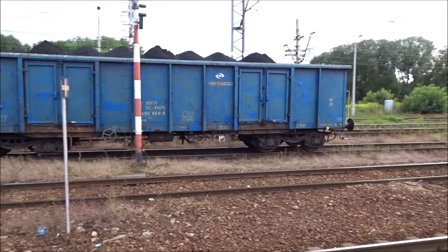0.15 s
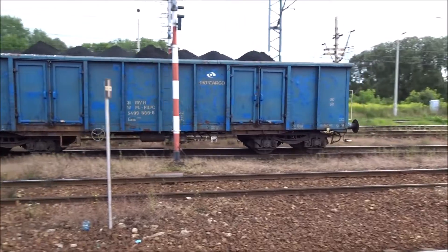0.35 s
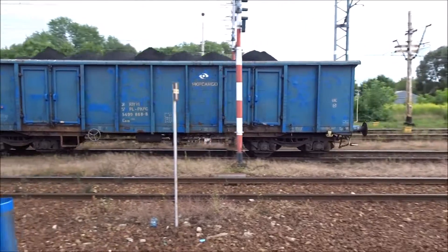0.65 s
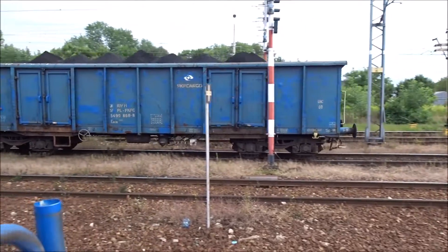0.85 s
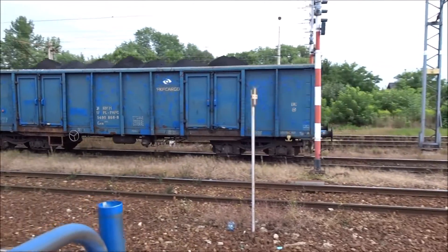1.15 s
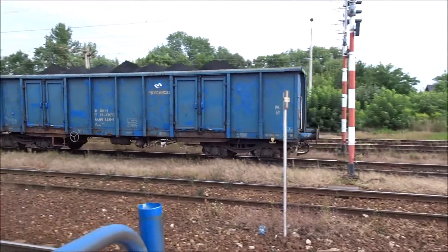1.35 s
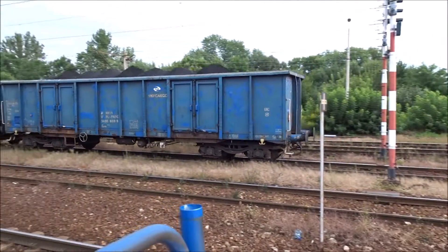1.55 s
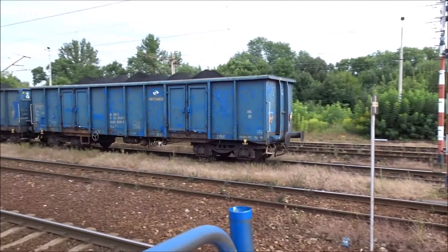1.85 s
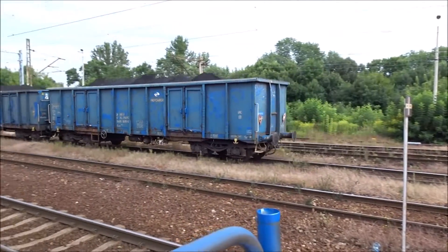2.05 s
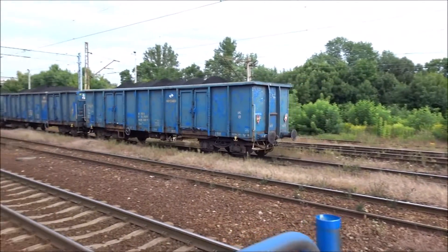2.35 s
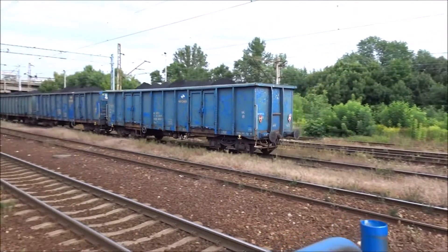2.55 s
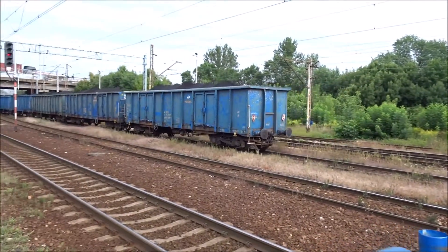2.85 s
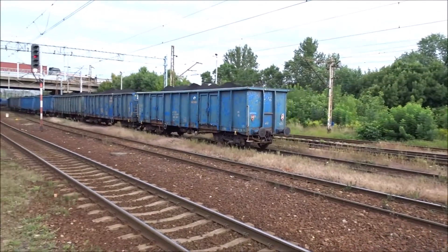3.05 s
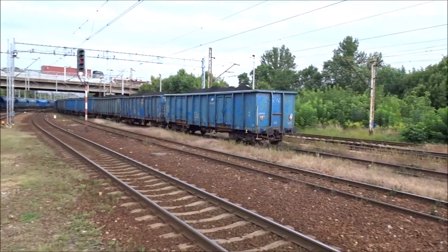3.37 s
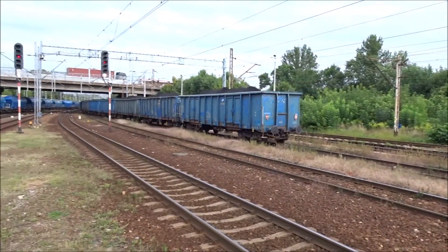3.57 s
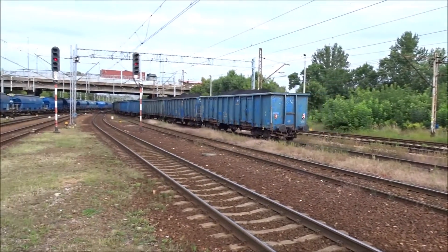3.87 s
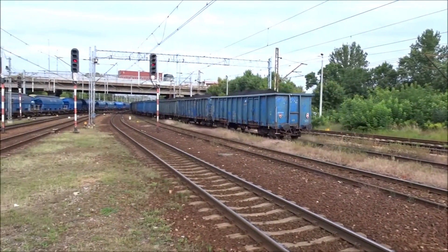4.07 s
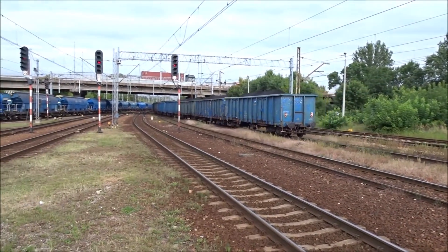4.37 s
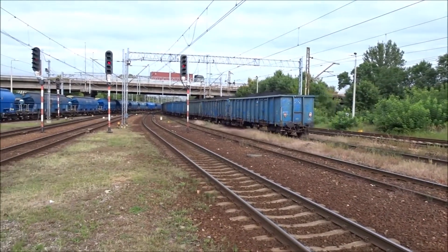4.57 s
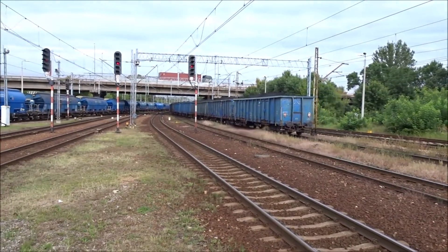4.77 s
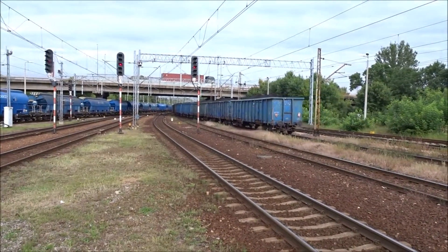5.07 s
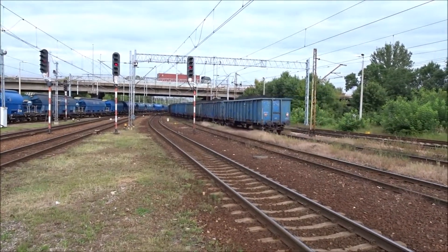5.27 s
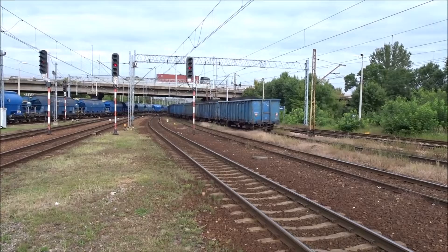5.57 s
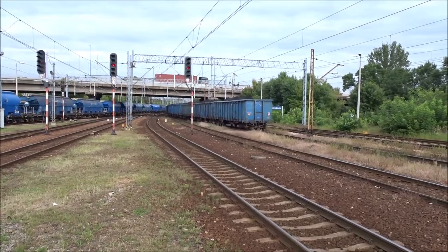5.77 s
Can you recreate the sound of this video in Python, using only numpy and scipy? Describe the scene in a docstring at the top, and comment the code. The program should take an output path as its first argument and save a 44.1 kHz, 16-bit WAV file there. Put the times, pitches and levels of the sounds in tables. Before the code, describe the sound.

Close, loud wagon wheels clatter on steel rails in the open air: gritty cracks, hollow knocks, loose metal rattling and wavering ringing tones. Sharp ticks through the rail slightly precede many blows. After a brief lull around three and a half seconds come two more strong groups, then weaker clacks as the train recedes. A handheld stereo microphone catches little deep rumble and a short hard reflection.

```python
"""Loaded freight wagons roll away over rail joints and points in an open yard.
Rolling is banded noise, resonant steel and small ringing knocks, swelling after each axle's noisy blow.
Bright hissy ticks come along the steel rail, which outruns the air; short wavering tones stand out of
the clatter. Noise makes the deep ground rumble and one brief flange hiss; a nearby hard surface adds
one short echo."""
import sys
import numpy as np
from scipy import signal
from scipy.fft import rfft, irfft, next_fast_len
from scipy.io import wavfile
from scipy.ndimage import map_coordinates

SR = 44100
rng = np.random.default_rng(int(sys.argv[2]) if len(sys.argv) > 2 else 0)


def unload_audio(sound):
    """Save the sound as a 16-bit wav file, at the path given as the first command line argument."""
    columns = np.transpose(np.atleast_2d(sound))
    # keep every value between -1 and 1, then stretch to whole-number steps
    steps = np.round(np.clip(columns, -1, 1) * 32767)
    wavfile.write(sys.argv[1], SR, steps.astype(np.int16))


N = 261072

# usual colour of wheels on rail and shaking wagons, relative: [f/Hz, level per Hz/dB]
ROLLING_COLOUR = [(130, -48), (200, -18), (290, -5), (450, -6), (800, -0.5), (1300, 1.5), (2000, -1.5),
                  (2600, 1), (3500, -3.5), (5000, -5), (7000, -13), (10000, -19), (13000, -33),
                  (15500, -50)]
# how alike left and right are across the spectrum: [f/Hz, likeness 0-1]
LEFT_RIGHT_LIKENESS = [(60, 0.76), (130, 1), (290, 1), (640, 1), (1410, 0.9), (3100, 0.67), (6820, 0.29),
                       (15000, 0.49)]
# steady rolling under the blows, with tilts against the usual colour:
# [t/s, level/dB, bass/dB, upper middle/dB, treble/dB]
STEADY_ROLLING = [(0, -18, 1, -2, -1), (.9, -18, -0.5, -2, 0.5), (1.6, -19, -5.5, -6.5, -2),
                  (2.1, -17, -0.5, -2.5, -1), (2.4, -18.5, 0.5, -4.5, 1.5), (2.8, -16.5, -5, -4.5, -4),
                  (3.4, -20.5, 0.5, -5.5, -4.5), (3.9, -19.5, 2.5, -1, -0.5), (4.9, -22, -2, -6, -4),
                  (5.92, -21.5, -1, -2, -3)]
# axles on a joint, heard through the air: [t/s, clatter level/dB, clatter duration/s, brightness/dB,
# crack level/dB, knock level/dB, knock f/Hz, thud level/dB]
AXLE_BLOWS = [(0.048, -16, 0.037, 4, -21, -22, 708, -20), (0.287, -16.5, 0.097, -1.5, -19, -33, 705, -41),
              (0.548, -15.5, 0.055, -1.5, -22, -13, 495, -21), (0.678, -15, .12, 3, -32, -13, 820, -34),
              (0.921, -13.5, 0.15, 2.5, -17.5, -13.5, 664, -25), (1.222, -17, 0.1, 6, -14.5, -36, 797, -30),
              (1.91, -15, 0.06, -1, -30, -32, 624, -26), (2.156, -13.5, 0.09, 3, -24, -18.5, 596, -34),
              (2.27, -26, 0.026, -8, -26, -39, 673, -44), (2.428, -16, 0.11, 5, -19.5, -17, 620, -36),
              (2.596, -16, 0.035, -1, -16.5, -32, 676, -23), (2.62, -17, 0.062, 8, -21, -20, 613, -36),
              (2.834, -14, 0.14, 6.5, -17, -17, 790, -21), (3.095, -16, 0.099, 5, -14, -23, 576, -40),
              (3.482, -23, 0.12, 8, -33, -30, 790, -38), (3.709, -27, 0.053, 2, -24, -23.5, 611, -38),
              (3.781, -10.5, 0.097, -2.5, -26, -25, 800, -23),
              (4.008, -14.5, 0.044, -6, -21, -16, 570, -38), (4.034, -14, 0.11, 1.5, -31, -12, 750, -23),
              (4.268, -27, .015, 0, -19, -15, 810, -25.5), (4.295, -17.5, 0.11, 8, -18, -20, 610, -25),
              (4.619, -20.5, 0.12, 6, -33, -19, 748, -37), (4.845, -30, 0.054, 0, -29, -40, 740, -40),
              (5.058, -23, 0.089, 13, -31, -37, 746, -37), (5.32, -22, 0.095, 5, -27, -37, 686, -45),
              (5.558, -23.5, 0.15, 6, -27, -28, 720, -30), (5.8, -22.5, 0.045, 8, -21, -26, 732, -27),
              (5.857, -21, 0.093, 8, -26, -38, 711, -46)]


def from_db(db):
    """Gain of a level in dB."""
    return 10 ** (np.asarray(db) / 20)


def rms_one(x):
    """Scaled to rms 1."""
    return x / np.sqrt(np.mean(x ** 2) + 1e-20)


def in_time(rows):
    """Each column of a timed table, interpolated sample by sample."""
    s, *columns = np.transpose(rows)
    return [np.interp(np.arange(N) / SR, s, c) for c in columns]


def at_hz(points, hz):
    """A spectrum read on a log-frequency axis."""
    point_hz, value = np.transpose(points)
    return np.interp(np.log(hz), np.log(point_hz), value)


def drift(rate_hz):
    """Slow chance: noise at every 40th sample through a double one-pole low-pass; spread 1."""
    r = np.exp(-2 * np.pi * rate_hz * 40 / SR)
    noise = rng.standard_normal(N // 40 + 2002)
    slow = signal.lfilter([1], [1, -2 * r, r * r], noise)[2000:]  # start-up dropped
    return np.interp(np.arange(N) / 40, np.arange(len(slow)), rms_one(slow))


def ring(clicks, hz, t60):
    """A two-pole resonance: a unit click starts a dying sine of height 1, down 60 dB after t60 seconds."""
    r, w = from_db(-60 / (t60 * SR)), 2 * np.pi * hz / SR
    return signal.lfilter([0, np.sin(w)], [1, -2 * r * np.cos(w), r * r], clicks + 1e-18)


def bursts(times, levels_db, t60s, rises_s):
    """Envelope of events that rise quickly and die exponentially, each cut off after half a second."""
    out = np.zeros(N)
    for s, level_db, t60, rise_s in np.broadcast(times, levels_db, t60s, rises_s):
        i = round(s * SR)
        t = np.arange(min(N - i, SR // 2)) / SR
        decay = from_db(level_db - 60 * t / max(t60, .005))
        out[i:i + len(t)] += decay * (1 - np.exp(-t / max(rise_s, .0003)))
    return out


def spread(hz):
    """Gains of the common and the opposed (left minus right) part that give the likeness at this pitch."""
    alike = np.clip(at_hz(LEFT_RIGHT_LIKENESS, hz), 0, .99)
    return np.sqrt([[1 + alike], [1 - alike]])


def banded(spectrum, low_hz, control_db):
    """Third-octave bands of noise, a common and an opposed part; control_db(hz) moves each band in time."""
    out = 0
    edges = low_hz * 2 ** np.arange(0, np.log2(18000 / low_hz) + .3, 1 / 3)
    white = rng.standard_normal((2, 2, N))      # neighbouring bands get unrelated noise
    for k, (low, high) in enumerate(zip(edges, edges[1:])):
        hz = np.sqrt(low * high)
        band_filter = signal.butter(2, [low, high], "band", fs=SR, output="sos")
        band = signal.sosfilt(band_filter, white[k % 2])
        out = out + from_db(at_hz(spectrum, hz) + control_db(hz)) * band * spread(hz)
    return out


def clatter():
    """Power of rolling plus a swell per axle: level, its excess over the rolling, and brightness (all dB)."""
    swell_rise_s, fade_db_per_s = 0.02, 116     # each swell rises, lasts, then fades
    roll_db, t = in_time(STEADY_ROLLING)[0], np.arange(SR // 2) / SR
    power, bright = from_db(roll_db) ** 2, np.zeros(N)
    for s, level_db, lasts, bright_db, *_ in AXLE_BLOWS:
        fading_db = level_db - fade_db_per_s * np.maximum(t - lasts, 0)
        swell = np.minimum(t / swell_rise_s, 1) * from_db(fading_db) ** 2
        i = round(s * SR)
        power[i:i + len(t)] += swell[:N - i]
        bright[i:i + len(t)] += bright_db * swell[:N - i]
    level_db = 10 * np.log10(power)
    return level_db, level_db - roll_db, bright / power     # brightness counts by share of the power


def roar(level_db, bass_db, bright_db, top_db, uneven_db, own_db):
    """Wheels rumbling on rough rail and many parts shaking; all bands throb together, each also alone."""
    throb = uneven_db * drift(31)
    # share of each tilt by pitch: (Hz, 0-1)
    bass_share = [(250, 1), (700, 0)]
    bright_share = [(2500, 0), (6000, 1), (11000, 0)]
    top_share = [(6000, 0), (11000, 1)]

    def control_db(hz):
        tilt_db = at_hz(bass_share, hz) * bass_db
        tilt_db = tilt_db + at_hz(bright_share, hz) * bright_db
        tilt_db = tilt_db + at_hz(top_share, hz) * top_db
        return tilt_db + throb + own_db * drift(16.3)

    return from_db(level_db) * rms_one(banded(ROLLING_COLOUR, 125.5, control_db))


def hum(level_db, uneven_db):
    """Rail roughness keeps the steel modes sounding, each waxing and waning alone."""
    # resonances of wheels and wagon plates, relative: [f/Hz, width/Hz, level/dB]
    modes = [(304, 27, -7.5), (750, 70, -11.5), (838, 38, 0), (1103, 32, -3.5), (1290, 76, -1),
             (1667, 67, 0.5), (1914, 73, -0.5), (2273, 60, -8), (2558, 70, 4), (2930, 390, -14),
             (3603, 94, -4), (4310, 69, -5.5), (6500, 48, -10)]
    out = 0
    for (hz, width, mode_db), noise in zip(modes, rng.standard_normal((len(modes), 2, N))):
        gain = from_db(mode_db + uneven_db * drift(9.4))
        t60 = np.log(1000) / np.pi / width      # a narrower mode rings longer
        out = out + gain * spread(hz) * rms_one(ring(noise, hz, t60))
    return from_db(level_db) * rms_one(out)


def rattle(level_db, per_s, cycles):
    """Small random knocks of links, brake gear and plates, each dying by 60 dB in the given cycles."""
    sizes = from_db(3.5 * np.minimum(rng.exponential(1, N), 4)) * rng.choice([-1, 1], N)
    born = rng.random(N) < per_s / SR
    dealt = rng.integers(0, 24, N)      # which pitch each knock excites
    rings = 0
    for k, hz in enumerate(np.geomspace(600, 6500, num=24)):
        knocks = sizes * born * (dealt == k)
        rings = rings + from_db(at_hz(ROLLING_COLOUR, hz)) * hz * ring(knocks, hz, cycles / hz)
    return from_db(level_db) * rms_one(rings)


def ground_rumble():
    """Deep rumble through the ground: low noise whose level wanders slowly."""
    # rumble level: [t/s, level/dB]
    rumble_level = [(0, -37), (.7, -33), (1.6, -34.5), (2.3, -42.5), (4.3, -45), (5.92, -45)]
    # rumble colour, relative: [f/Hz, level per Hz/dB]
    rumble_colour = [(25, 15.5), (50, 2), (90, -17), (130, -11), (180, -5.5), (260, -7), (400, -46)]
    level_db = in_time(rumble_level)[0] + 1.0 * drift(1.3)
    return from_db(level_db) * rms_one(banded(rumble_colour, 25.1, lambda hz: 0))


def echo(x):
    """One dull reflection with a turned phase: it combs the low and middle range."""
    delay_s, turn_rad, cut_hz = 0.001762, -1.04, 2800
    size = next_fast_len(N + 4096)
    hz = np.arange(size // 2 + 1) * SR / size
    path = np.exp(-1j * (2 * np.pi * hz * delay_s + turn_rad)) / (1 + (hz / cut_hz) ** 8)
    return irfft(rfft(x, size) * path, size)[..., :N]


def rail_ticks():
    """Sound in the steel outruns the air: a hissy tick with a longer shimmer; earlier ticks keep more edge."""
    # ticks carried by the rail: [t/s, level/dB]
    tick_times = [(0.0164, -35.5), (0.277, -33), (0.5192, -32), (0.6804, -32), (0.9218, -25),
                  (1.1946, -26.5), (1.8966, -29), (2.1545, -24.5), (2.398, -27), (2.5694, -33.5),
                  (2.608, -35), (2.812, -31), (2.8285, -28), (2.9692, -32), (3.069, -25.5), (3.1684, -49),
                  (3.5694, -28.5), (3.768, -30), (3.7983, -42), (4.0068, -38), (4.022, -22), (4.263, -24),
                  (4.2976, -39), (4.374, -36), (4.6164, -30), (5.0724, -31), (5.5662, -29.5), (5.8027, -29),
                  (5.8621, -40)]
    # tick hiss, relative: [f/Hz, level per Hz/dB]
    tick_colour = [(2350, -28), (4000, 0.5), (5920, 0.5), (6640, 2.5), (11700, -5), (12500, 4),
                   (15600, -19)]
    # tick level above 10 kHz, bright until 4.3 s, then suddenly dull: [t/s, level/dB]
    edge_level = [(0, -2.5), (2.5, -5), (4.3, -4), (4.6, -32), (5.92, -31)]
    tick_t60_s, shimmer_t60_s, shimmer_db = 0.076, 0.43, -4
    rough_db = 4    # uneven, as many small strikes
    s, level_db = np.transpose(tick_times)
    shape = bursts(s, level_db, tick_t60_s, 0.0014)
    shape = shape + bursts(s, level_db + shimmer_db, shimmer_t60_s, 0.031)
    hiss, out = banded(tick_colour, 4200, lambda hz: 0), 0
    for kind, db in ("low", 0), ("high", in_time(edge_level)[0]):
        split = signal.butter(4, 10000, kind, fs=SR, output="sos")
        out = out + from_db(db) * rms_one(signal.sosfilt(split, hiss))
    return out * shape * from_db(rough_db * drift(52.0))


def blows():
    """Wheel drops on the joint: a gritty crack through the wagon's colour, a short knock and a deeper thud."""
    rebound_db = -7.5   # the wheelset lands once more as the clatter ends, against its clatter level
    rough_db = 3        # a crack is a cluster of uneven strikes
    low_cut_hz = 160    # the blows carry little sound below this
    s, clatter_db, lasts, _, crack_db, knock_db, knock_hz, thud_db = np.transpose(AXLE_BLOWS)
    rebound_s = np.minimum(s + lasts, N / SR)
    cracks = bursts(s, crack_db, 0.23, rises_s=0.0013)
    cracks = cracks + bursts(rebound_s, clatter_db + rebound_db, 0.088, rises_s=0.004)
    grit = from_db(rough_db * drift(43.0))
    out = cracks * grit * rms_one(banded(ROLLING_COLOUR, 393, lambda hz: 0))
    thud_band = signal.butter(3, [170, 450], "band", fs=SR, output="sos")
    low = signal.sosfilt(thud_band, rng.standard_normal(N))
    out[0] += bursts(s, thud_db, 0.12, rises_s=0.0036) * rms_one(low)     # common part only
    t = np.arange(SR // 4) / SR
    for at, level_db, hz, noise in zip(s, knock_db, knock_hz, rng.standard_normal((len(s), len(t)))):
        shape = from_db(level_db - 60 * t / 0.089) * (1 - np.exp(-t / 0.0032))
        knock = rms_one(ring(noise, hz, 16.0 / hz)) * shape
        i = round(at * SR)
        out[0, i:i + len(t)] += knock[:N - i]
    return signal.sosfilt(signal.butter(3, low_cut_hz, "high", fs=SR, output="sos"), out)


def wavering_tones():
    """Each tone swells, dies and loses its phase: a sine whose phase takes a random walk."""
    # short wavering tones standing out of the clatter: [t/s, approximate peak level/dB, f/Hz,
    # approximate rise/s]
    clatter_tones = [(0.31, -15.5, 2800, 0.017), (0.351, -18, 1314, 0.017), (0.679, -14, 788, 0.011),
                     (0.719, -10, 1900, 0.007), (0.923, -16.5, 1278, .021), (0.969, -15, 6060, .012),
                     (1.01, -21, 2640, 0.013), (1.255, -12, 2400, 0.017), (2.191, -17, 3250, 0.011),
                     (2.215, -10.5, 1154, 0.02), (2.305, -18, 1196, 0.014), (2.416, -16, 2560, .016),
                     (2.421, -14.5, 2880, .022), (2.44, -18.5, 4340, .014), (2.469, -17, 1290, 0.011),
                     (2.473, -17.5, 4350, 0.012), (2.641, -15, 2490, .013), (2.666, -14, 1780, .025),
                     (2.886, -10.5, 1828, .025), (3.104, -15, 2490, 0.021), (3.123, -15, 1906, 0.036),
                     (3.786, -16, 1883, 0.019), (3.817, -12, 1115, .012), (4.024, -16.5, 700, 0.0099),
                     (4.064, -21, 2380, 0.019), (4.094, -10, 1817, 0.014), (4.257, -19, 1107, 0.017),
                     (4.26, -20, 772, .019), (4.294, -14.5, 2425, 0.0087), (4.34, -9, 1806, .024),
                     (4.368, -19.5, 6480, 0.0077)]
    rough_hz = 37   # width that the wandering phase gives each tone
    out, t = np.zeros(N), np.arange(SR // 4) / SR
    all_steps = rng.standard_normal((len(clatter_tones), len(t)))
    for (s, peak_db, hz, rise_s), steps in zip(clatter_tones, all_steps):
        wander = np.cumsum(steps) * np.sqrt(2 * np.pi * rough_hz / SR)
        tone = np.sin(2 * np.pi * hz * t + wander)
        age = t / max(rise_s, .004)
        shape = from_db(peak_db) * age * np.exp(1 - age ** 1.16)
        i = round(s * SR)
        out[i:i + len(t)] += (shape * tone)[:N - i]
    return out


def flange():
    """A flange brushing the rail: a narrow band of high hiss that swells and dies."""
    peak_s, level_db, half_width_s = 3.59, -39, .05
    band = signal.butter(2, (11500, 13000), "band", fs=SR, output="sos")
    shape = np.exp(-((np.arange(N) / SR - peak_s) / half_width_s) ** 2)
    return from_db(level_db) * shape * rms_one(signal.sosfilt(band, rng.standard_normal((2, N))))


def scene():
    """Air-borne sound gets the echo; steel and ground add theirs; then the two microphone ports."""
    # where the train is: [t/s, left lead/ms, echo share 0-1]
    train_place = [(0, 0.071, 0.11), (1.5, 0.056, 0.14), (2.4, 0.026, 0.22), (4.2, 0.0087, 0.33),
                   (5.92, 0.0084, 0.28)]
    bass_follows, treble_follows = -1.26, -.2   # dB of colour per dB of clatter over the rolling
    pan_offset_db, pan_db_per_ms = -0.77, 31    # left-right level goes with the lead
    level_db, over_db, axle_bright_db = clatter()
    _, bass_db, bright_db, top_db = in_time(STEADY_ROLLING)
    bass_db = bass_db + bass_follows * over_db
    bright_db = bright_db + axle_bright_db
    top_db = top_db + treble_follows * over_db
    lead_ms, echo_share = in_time(train_place)
    pan_db = pan_offset_db + pan_db_per_ms * lead_ms

    # the layers' two rows are common and opposed
    air = roar(level_db - 4.5, bass_db, bright_db, top_db, uneven_db=0.27, own_db=1.5) + blows()
    air += hum(level_db - 10.5, uneven_db=3.0)
    knocks = rattle(level_db - 14.5, per_s=500.0, cycles=43.0)
    scattered = from_db(-40) * np.roll(knocks, 300)     # scattered by the yard
    air += np.array([knocks, scattered])
    ground = ground_rumble()
    steel = rail_ticks() + flange() + wavering_tones() * [[1], [.3]]    # tones lean left
    common, opposed = air + echo_share * echo(air) + steel + ground

    # the train is to the left, so that port hears it a little early
    early = np.arange(N) + lead_ms * SR / 1000
    left = map_coordinates(common + opposed, [early], order=3, mode="nearest")
    return np.array([left, common - opposed]) * from_db([pan_db / 2, -pan_db / 2])


def record(dry):
    """A small microphone loses the bass; the highest peaks clip; the top is cut."""
    low_cut_hz, top_cut_hz = 125, 15690
    thin = signal.sosfilt(signal.butter(3, low_cut_hz, "high", fs=SR, output="sos"), dry)
    clipped = np.clip(thin, -.97, .97)
    return signal.sosfilt(signal.ellip(12, .5, 80, top_cut_hz, fs=SR, output="sos"), clipped)


dry = scene()
out = record(dry)
unload_audio(out)
```